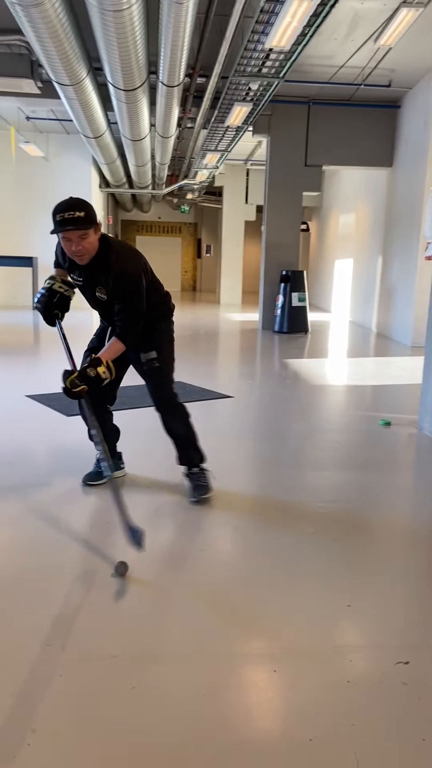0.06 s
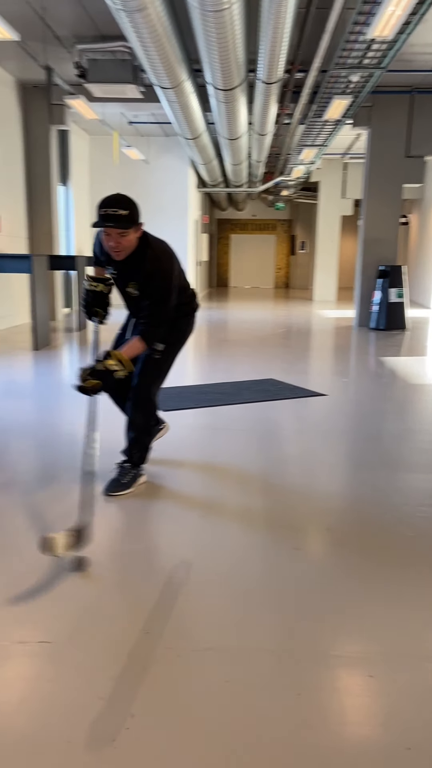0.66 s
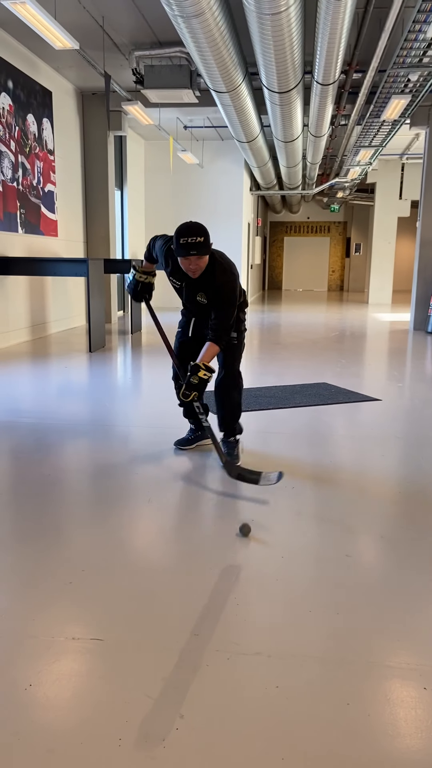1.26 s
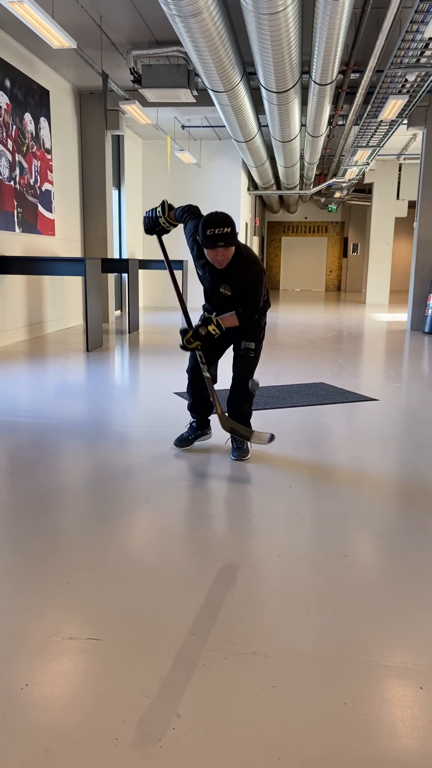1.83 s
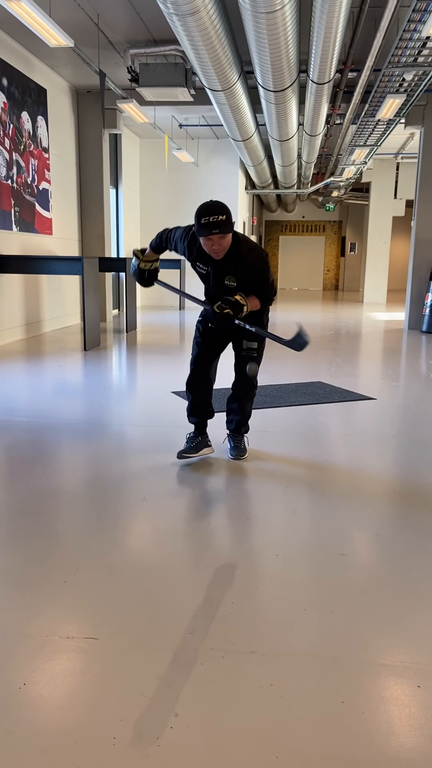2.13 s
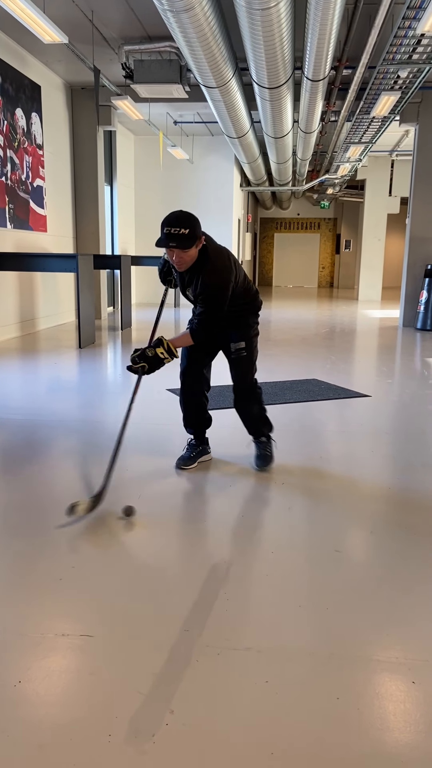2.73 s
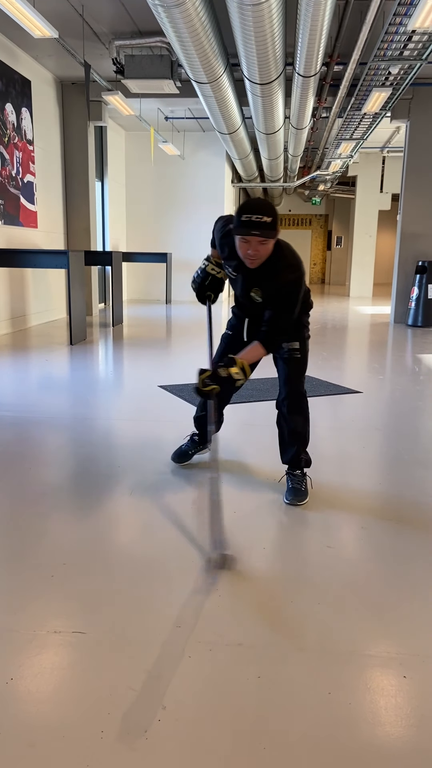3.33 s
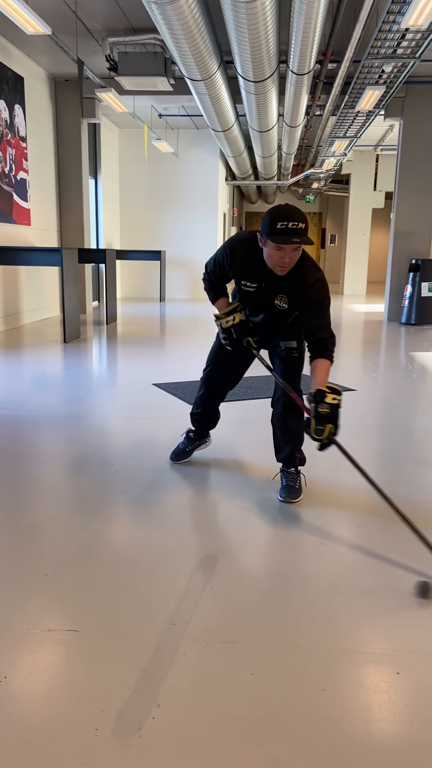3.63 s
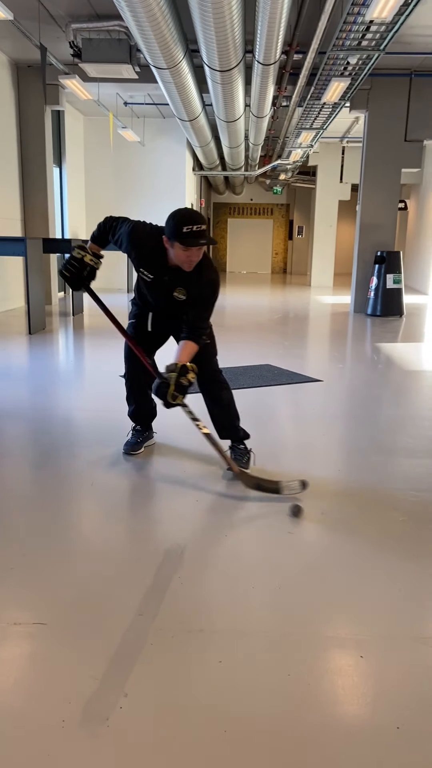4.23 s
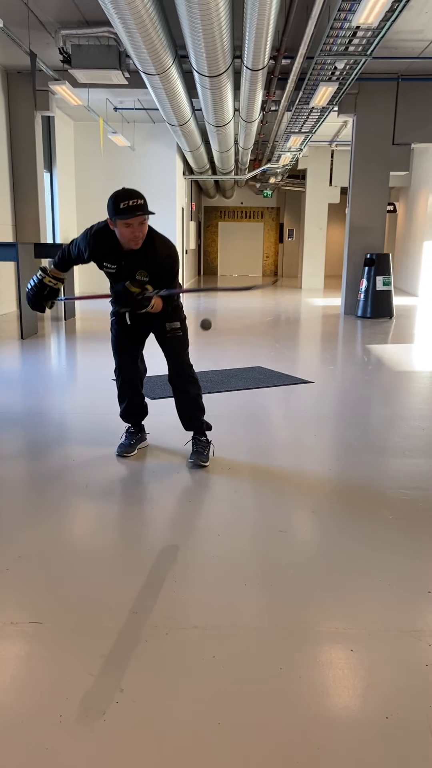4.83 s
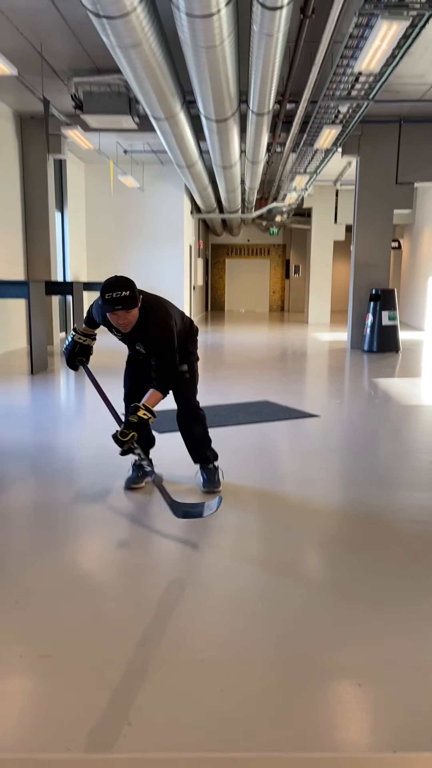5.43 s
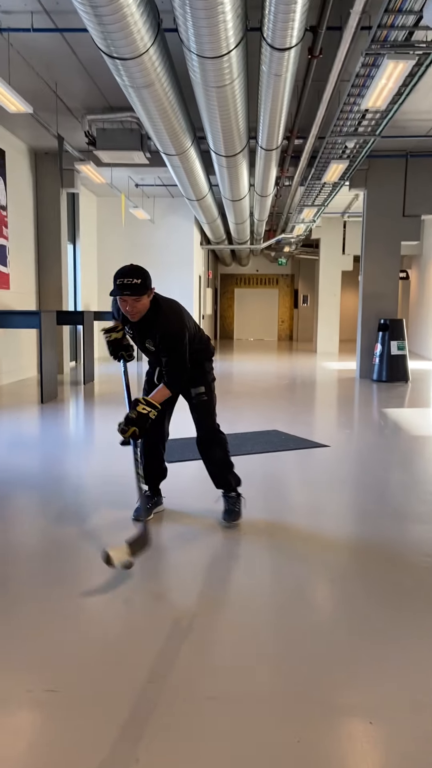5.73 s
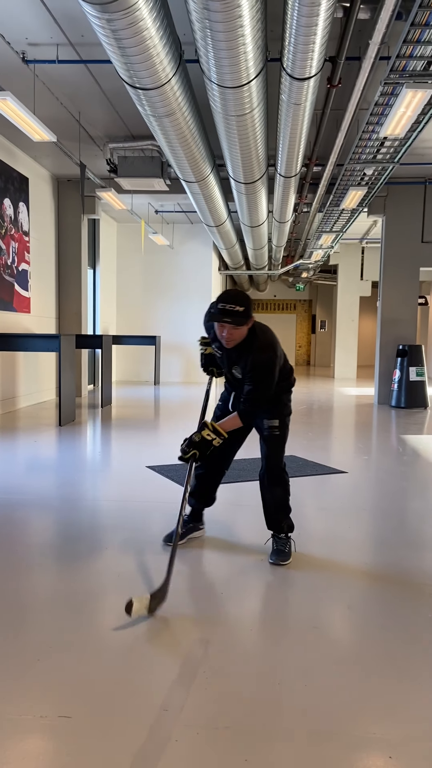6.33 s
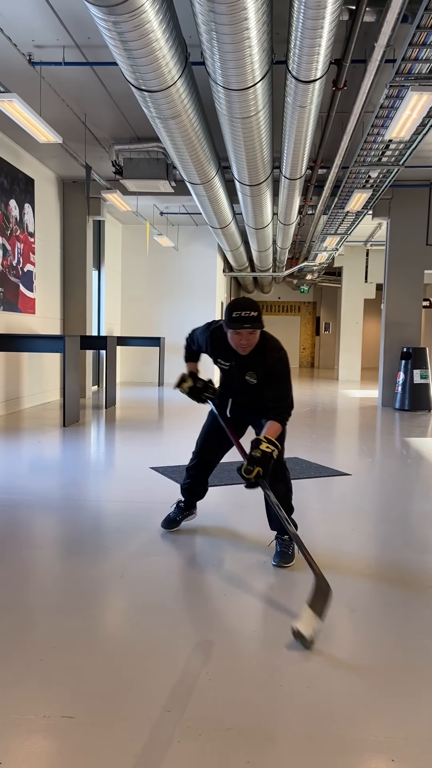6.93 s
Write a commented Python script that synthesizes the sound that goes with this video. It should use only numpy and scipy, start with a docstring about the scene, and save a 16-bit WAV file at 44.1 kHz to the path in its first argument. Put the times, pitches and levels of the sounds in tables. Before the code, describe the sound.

A hockey stick slaps and taps a hard floor and knocks a ball about, echoing through a large hall.

```python
"""A hockey stick slaps and taps the bare floor of a long concrete hall and knocks a hard ball about.
Each blow makes the floor, blade, ball and shaft ring briefly, and the ball gives a hollow pop.
The sound echoes off the ceiling and a pillar, then fills the hall and dies away.
Shoes thump and scuff softly, and the ventilation hums behind it all."""
import sys
import numpy as np
from scipy import signal
from scipy.fft import rfft, irfft, next_fast_len
from scipy.io import wavfile
from scipy.ndimage import uniform_filter1d

SR = 44100
rng = np.random.default_rng(int(sys.argv[2]) if len(sys.argv) > 2 else 0)


def wav_out(sig):
    """Save sig, one row per channel (or a flat mono array), as 16-bit PCM at SR to the path in sys.argv[1]."""
    wavfile.write(sys.argv[1], SR, np.round(np.clip(np.atleast_2d(sig).T, -1, 1) * 32767).astype(np.int16))


N = 307377

# The blade slaps the floor edge first, then falls flat. Each row: start in seconds, level in dB,
# extra direct sound in dB, grit in dB, delay of the flat landing in seconds, its level against the slap
# in dB, favoured pitch in Hz, its boost in dB, hardness in dB, extra crack and tick in dB,
# damping by the grip as a factor (smaller rings longer).
BLADE_SLAPS = [(-.076, -9.5, 3, -8, .013, -4.5, 766, 2, -1, .5, 0.89),
               (.187, -14.5, 0.5, 1, 0.0094, -18, 1150, 8, 6, 2.5, .8),
               (0.216, -12.5, 4, 7, 0.012, 0.5, 1740, 14, 2.5, -3, 0.6),
               (0.5084, -11.5, 0.5, -5.5, 0.012, -5.5, 1340, 3, -5, .5, 1),
               (2.3997, -8.5, 1.5, 3, 0.014, -12, 1860, 12.5, 3.5, 1, 0.46),
               (2.8338, -8.5, 1, 3, .0215, -10, 945, 3, -1, 2.5, 0.63),
               (3.0757, -14.5, 0.5, -14, 0.013, -5.5, 1060, 6.5, 1, 0, 1),
               (3.2837, -11.5, 0.5, 6, 0.023, -12, 2800, 11, -2, 2.5, 0.69),
               (3.2955, -9, -2.5, 2.5, .015, -10.5, 1380, 5, 3, -2.5, 1),
               (3.5452, -12, -2, 2, 0.015, -13, 2400, 4.5, 5, 4, 0.78),
               (3.7413, -17.5, -1, 6.5, 0.01, -4.5, 1006, 10.5, 4.5, 2.5, 0.65),
               (5.2006, -15.5, -1, -2.5, 0.013, -26, 1210, 8.5, 2, 2.5, 0.67),
               (5.6699, -13.5, 0, -6, .014, -21, 1010, 2, -5, 8, 0.7),
               (5.9969, -5.5, -3, 5, 0.016, -20, 1640, 5, 1.5, 3, 0.69),
               (6.0578, -15.5, 5.5, 1.5, 0.019, 0, 690, 6, -9, 9.5, 1),
               (6.301, -10, -3, -12, .013, -9.5, 1150, 1, 4.5, 1, .9),
               (6.4738, -9.5, -1, -15, 0.024, -4, 1500, 5.5, -.5, 3, 0.65),
               (6.8314, -13.5, -2.5, -9, 0.012, -15.5, 1360, 8, 2.5, -4, 0.93)]
# The blade's toe clicks, then scrapes. Each row: start in seconds, level in dB, extra direct sound in dB,
# delay of the scrape in seconds, its level against the click in dB, then the same last five as a slap.
TOE_CLICKS = [(.176, -16.5, -3, 0.0061, -7, 2560, 7, -0.5, 2, 0.62),
              (0.4232, -17, -2, 0.0092, -9, 1470, 10, 6, 3.5, 0.76),
              (.809, -16.5, -2, .015, -5.5, 2490, 9, 2.5, 3, 0.29),
              (2.3727, -24, -0.5, .008, 8, 2530, 12, 5, -3, 0.99),
              (3.0296, -17, -1, .013, -2.5, 2130, 6, 12, 10, 0.86),
              (4.949, -22, -2.5, 0.0072, -15, 2050, 1, 1.5, 3, 0.58),
              (5.1211, -23, 2, .008, 6, 3300, 8.5, 4, 0, 1),
              (5.6066, -25.5, -1, 0.0077, 5, 3130, 14, 6, -1, 1),
              (6.251, -12, -1.5, 0.014, -10, 3480, 3.5, 6, 13.5, 0.66),
              (6.761, -18, -7, 0.011, -4.5, 2030, 5, 5.5, 2, 0.96)]
# The blade knocks the ball. Each row: start in seconds, level in dB, extra direct sound in dB, pitch of
# the pop in Hz, its filter's width in Hz, rattle against the pop in dB, extra crack and tick in dB.
BALL_KNOCKS = [(.848, -18.5, 1.5, 1440, 1664, -2, 6.5), (2.7553, -13.5, 0, 1716, 1550, -3.5, -3.5),
               (4.279, -16.5, 0.5, 1580, 1100, -6.5, 3), (4.3335, -17.5, 1, 1940, 1400, -2.5, 3.5),
               (5.186, -16.5, 4.5, 1340, 1400, -3.5, -4)]
# The ball lands on its own. The rows read like those of the knocks.
BALL_BOUNCES = [(1.454, -31.5, -0.77, 1500, 2020, -1, 0.0022),
                (1.592, -24.5, -1.7, 1694, 1580, -7.5, 0.0065)]

# The tones (modes) at which each struck part rings. Each row: pitch in Hz, width in Hz, relative level
# in dB. A wider mode dies away sooner.
FLOOR_MODES = [(76, 79, -11.5), (147.4, 55, -1), (214.6, 79, 3), (316, 152, 2.5), (431, 127, -1)]
BLADE_MODES = [(472, 123, -5.5), (673, 87, -2), (820.5, 76, 0.5), (928, 138, 1.5), (1028, 188, 3),
               (1194, 188, -1)]
BALL_MODES = [(1314, 166, 2), (1653, 148, 5.5), (1928, 150, 5.5), (2237, 247, 3.5), (2654, 113, 2.5),
              (2914, 91, -3.5)]
SHAFT_MODES = [(2683, 286, -0.5), (2934, 203, 2), (3300, 480, -2.5), (3646, 100, 4.5), (4066, 215, 0.5),
               (4365, 142, -1), (4614, 153, 2.5), (5100, 370, 0), (5556, 390, 2)]
TICK_MODES = [(5850, 160, 15), (6390, 1000, 9), (6720, 510, 10.5), (8090, 1040, 5), (10500, 5000, 1.5),
              (15900, 1500, -6)]
FOOT_MODES = [(59, 48, -21), (132.6, 23, -1)]
# How each kind of contact shares its energy. Each lists, in relative dB: floor thud, blade clack,
# ball knock, shaft crack, high tick.
SLAP_SHARES = (-19.5, -2, 0, -6.5, -13)
FLAT_SHARES = (-17.5, -1.5, -9.5, -7.5, -19.5)
TOE_SHARES = (-14, -1, -1.5, -4, -17)
SCRAPE_SHARES = (-17.5, -16, -7.5, -1, -43)
KNOCK_SHARES = (-14.5, -9, -2, -5, -6.5)
BOUNCE_SHARES = (-6.5, 0.5, -6.5, -25.5, -45)
# A harder contact is brighter: the dB added to those five parts for each dB of hardness.
HARDNESS_TILT = (-1, -0.66, 0.43, 0.68, 0.29)

# How long the hall rings. Each row: pitch in Hz, seconds to fade by 60 dB.
HALL_FADE_TIMES = [(100, 1.4), (250, 2.43), (600, 2.1), (1500, 1.384), (2200, 1.47), (4000, 1.113),
                   (6500, 0.7), (10000, 0.51), (16000, 0.27)]
# Heavy steps. Each row: start in seconds, level in dB.
FOOTFALLS = [(2.38, -35.5), (4.28, -50), (5.12, -30), (5.6, -35)]
# Shoes and blade rub the floor. Each row: middle in seconds, length in seconds, level in dB, pitch in Hz.
FLOOR_SCUFFS = [(1.36, 0.029, -62, 3300), (2.198, 0.17, -80.5, 5640), (4.17, 0.2, -65, 12100),
                (4.912, 0.13, -70.5, 4450)]
# The tone of the air in the ducts. Each row: pitch in Hz, relative level in dB.
VENT_SPECTRUM = [(25, -20), (40, -10), (55, 0), (90, -4), (135, 1), (230, -13.5), (600, -19.5),
                 (1700, -12.5), (3400, -31), (5300, -33), (8000, -39.5), (15000, -53.5)]
# How alike the hall sounds on the left and right. Each row: pitch in Hz, likeness (1 is identical).
STEREO_LIKENESS = [(150, .997), (260, .985), (360, .92), (460, .75), (600, .45), (850, .38), (1300, .58),
                   (2000, .4), (3000, .15), (5000, .52), (7000, .98), (7700, .98), (10000, .78),
                   (13500, .97)]
# How far the left channel runs ahead of the right. Each row: pitch in Hz, phase in radians.
LEFT_PHASE_LEAD = [(100, 0), (1800, -.05), (3000, .9), (4200, .9), (5100, .3), (6300, 1.5), (7350, 3.14),
                   (8500, 4.5), (10400, 6.28), (12000, 7.9), (13550, 9.42), (16300, 12.3)]

BLOW_SIZE, LEAD = 4096, 8820  # in samples: one blow, and a run-up so that the hall starts out ringing


def stickwork(direct_boost_db=22, ceiling_s=0.0124, ceiling_db=-7.5, pillar_s=0.0215, pillar_db=-17.5):
    """Each blow arrives directly, off the ceiling and off a pillar; blows and steps make the hall ring."""
    near = np.zeros((2, N + LEAD))
    spots = np.zeros((5, N + LEAD))  # sounds take turns among five spots, each with its own hall ring
    for k, (start, db, sound, direct) in enumerate([*slaps(), *toe_taps(), *ball_pops()]):
        direct = undb(db + direct_boost_db) * direct
        pillar_delay = pillar_s * rng.uniform(0.95, 1.05)
        for side in near:  # each microphone gets its own spray of echoes
            add(side, start, direct)
            add(side, start + ceiling_s, echo(direct) * undb(ceiling_db))
            add(side, start + pillar_delay, echo(direct) * undb(pillar_db))
        add(spots[k % len(spots)], start, undb(db) * sound)
    for k, (start, db) in enumerate(FOOTFALLS):
        add(spots[k % len(spots)], start, undb(db) * ring(1, FOOT_MODES))
    reverb = sum(signal.fftconvolve(spot[None], hall(), axes=1)[:, :N + LEAD] for spot in spots)
    return (near + reverb)[:, LEAD:]


def slaps():
    """The blade's edge slaps, then its face clacks. Gives start, dB, sound for the hall, direct sound."""
    for start, db, direct_db, grit_db, flat_s, flat_db, *tone in BLADE_SLAPS:
        slap = blow(SLAP_SHARES, grit_db, *tone)
        yield start, db, slap, undb(direct_db) * head_on(slap)
        flat = blow(FLAT_SHARES, grit_db=-0.5, hz=760, boost_db=11)
        yield start + flat_s, db + flat_db, flat, undb(2.5) * flat


def toe_taps():
    """The toe clicks, then a gritty scrape rings the shaft. Gives the same four things as slaps()."""
    for start, db, direct_db, scrape_s, scrape_db, hz, boost_db, hardness, crack_db, damping in TOE_CLICKS:
        tone = dict(hz=hz, boost_db=boost_db, damping=damping)
        click = blow(TOE_SHARES, grit_db=-2.5, hardness=hardness, crack_db=crack_db, **tone)
        yield start, db, click, undb(direct_db) * head_on(click)
        scrape = dull(blow(SCRAPE_SHARES, grit_db=7.5, grit_s=0.0088, **tone), top_hz=5000)
        yield start + scrape_s, db + scrape_db, scrape, undb(-0.5) * scrape


def ball_pops():
    """The ball pops while blade or floor rattle under it. Gives the same four things as slaps()."""
    for rows, shares, grit_db in ((BALL_KNOCKS, KNOCK_SHARES, 4), (BALL_BOUNCES, BOUNCE_SHARES, -6.5)):
        for start, db, direct_db, hz, width, rattle_db, crack_db in rows:
            # a soft contact: filtering three times makes the pop swell over a cycle or two
            pop = unit(irfft(resonance(bins(BLOW_SIZE), hz, width) ** 3))
            rattle = dull(blow(shares, grit_db, crack_db=crack_db, damping=1.63), top_hz=5630)
            knock = unit(pop + undb(rattle_db) * rattle)
            yield start, db, knock, undb(direct_db) * knock


def blow(shares_db, grit_db, hz=1000, boost_db=0, hardness=0, crack_db=0, damping=1, grit_s=0.0035):
    """One contact rings every part; where it lands favours one pitch, and hardness shifts the balance."""
    emphasis = 1 + (undb(boost_db) - 1) * resonance(bins(BLOW_SIZE), hz, width=480)
    push = contact(grit_db, grit_s) * emphasis
    tilt_db = hardness * np.array(HARDNESS_TILT) + crack_db * np.array([0, 0, 0, 1, 1])
    shares = unit(undb(np.array(shares_db) + tilt_db))
    parts = (FLOOR_MODES, BLADE_MODES, BALL_MODES, SHAFT_MODES, TICK_MODES)
    return sum(share * ring(push, modes, damping) for share, modes in zip(shares, parts))


def contact(grit_db, grit_s, snap_s=0.00044, grit_top_hz=7000):
    """The spectrum of a push: a hard snap, then gritty chatter, with all pitches about equally strong."""
    t = np.arange(BLOW_SIZE) / SR
    burst = rfft(rng.standard_normal(BLOW_SIZE) * np.exp(-t / snap_s))
    snap = irfft(burst / np.abs(burst)) * np.exp(-t / (10 * snap_s))
    grit = rng.standard_normal(BLOW_SIZE) * rng.exponential(size=BLOW_SIZE) * np.exp(-t / grit_s)
    soft_grit = rfft(unit(grit)) / (1 + 1j * bins(BLOW_SIZE) / grit_top_hz)
    push = rfft(unit(snap)) + undb(grit_db) * soft_grit
    evened = irfft(push / np.sqrt(uniform_filter1d(np.abs(push) ** 2, size=21)))
    fade = np.cos(np.pi / 2 * t / t[-1]) ** 2
    return rfft(evened * fade)


def ring(push, modes, damping=1, scatter=0.017):
    """A pushed part rings at its own pitches, which shift a little with grip and contact point."""
    f = bins(BLOW_SIZE)
    shift = 1 + scatter * rng.standard_normal(len(modes))
    # neighbouring modes bend the struck point in opposite directions
    body = sum((-1) ** k * undb(db) * resonance(f, hz * shift[k], width * damping)
               for k, (hz, width, db) in enumerate(modes))
    edges_hz = [modes[0][0] * 0.55, min(modes[-1][0] * 0.89, SR / 2 - 1000)]
    band = signal.butter(N=2, Wn=edges_hz, btype="band", fs=SR, output="sos")
    return unit(signal.sosfilt(band, irfft(push * body)))


def head_on(sound, beam_hz=6000, beam_db=2, rattle_s=0.001412, rattle_db=2):
    """A blow heard directly: a crack, its treble beamed forward by the blade, then the parts rattling."""
    first = crack(sound)
    beam = signal.lfilter(*signal.butter(N=1, Wn=beam_hz, btype="high", fs=SR), first)
    rattle = np.pad(sound, (int(rattle_s * SR), 0))[:BLOW_SIZE]
    return unit(first + undb(beam_db) * beam + undb(rattle_db) * rattle)


def crack(sound, delay_at_1khz_s=0.001185):
    """The sharp front of a blow; bending waves carry the treble out first."""
    colour = np.sqrt(np.abs(uniform_filter1d(np.abs(rfft(sound)) ** 2, size=25)))
    # keep the tone colour but pack the energy at the very start (minimum phase)
    cepstrum = irfft(np.log(colour + colour.max() / 1000))
    fold = 1 + np.sign(BLOW_SIZE // 2 - np.arange(BLOW_SIZE))
    fold[0] = 1
    bass_lag = 4 * np.pi * delay_at_1khz_s * np.sqrt(1000 * bins(BLOW_SIZE))
    return unit(irfft(np.exp(rfft(cepstrum * fold) - 1j * bass_lag)))


def dull(sound, top_hz):
    """A soft contact leaves out the treble."""
    return unit(signal.sosfilt(signal.butter(N=2, Wn=top_hz, fs=SR, output="sos"), sound))


def echo(sound, spray_s=0.0057, spray_db=-5):
    """A surface throws a blow back as one clear copy and a short spray of later ones."""
    t = np.arange(BLOW_SIZE // 8) / SR
    spray = undb(spray_db) * unit(rng.standard_normal(len(t)) * np.exp(-t / spray_s))
    return signal.fftconvolve(sound, unit((t == 0) + spray))


def hall(early_db=-7, early_s=0.04, late_db=-11.5, build_s=0.0053):
    """The hall's answer to a click: dense early echoes, then a long tail that loses its treble first."""
    size = 2 * SR
    t, f = np.arange(size) / SR, bins(size)
    noise = stereo_noise(size) / np.sqrt(2)
    early = undb(early_db) * np.exp(-t / early_s)
    pitches, fade_times = np.transpose(HALL_FADE_TIMES)
    response = 0
    for one_band, fade_s in zip(np.eye(len(pitches)), fade_times):
        band = along(np.c_[pitches, one_band], f)
        late = undb(late_db) * np.exp(-np.log(1000) * t / fade_s)
        response = response + irfft(noise * band) * np.hypot(early, late)
    return response * (1 - np.exp(-(t / build_s) ** 2))


def scuffs():
    """Shoes and blade rub the floor in short, soft swells of noise."""
    t, noise, track = np.arange(N) / SR, rng.standard_normal(N), 0
    for middle, length, db, hz in FLOOR_SCUFFS:
        rub = signal.lfilter(*signal.iirpeak(hz, Q=1, fs=SR), noise)
        swell = np.exp(-(2 * (t - middle) / length) ** 2)
        track = track + undb(db) * rub / rub.std() * swell
    return track


def ventilation(level_db=-58):
    """Air rushes steadily through the ducts, strongest in the bass."""
    size = 2 * next_fast_len(N // 2 + 1)
    air = irfft(stereo_noise(size) * undb(along(VENT_SPECTRUM, bins(size))))[:, :N]
    return undb(level_db) * air / air.std()


def stereo_noise(size):
    """Left and right spectra of noise that is more alike at some pitches than at others."""
    shared, apart = rfft(rng.standard_normal((2, size)))
    alike = np.clip(along(STEREO_LIKENESS, bins(size)), 0, 1)
    return shared * np.sqrt(1 + alike) + np.array([[1], [-1]]) * apart * np.sqrt(1 - alike)


def resonance(f, hz, width):
    """How one mode answers each frequency in f: 1 at its own pitch, less further away."""
    return 1j * f * width / (hz ** 2 - f ** 2 + 1j * f * width)


def add(track, start_s, sound):
    """Lay a sound into a track that begins LEAD samples early."""
    start = max(int(start_s * SR) + LEAD, 0)
    track[start:start + len(sound)] += sound[:len(track) - start]


def along(points, hz):
    """Read between (Hz, value) points, with every octave equally wide."""
    f, value = np.transpose(points)
    return np.interp(np.log(np.maximum(hz, 1)), np.log(f), value)


def bins(size):
    """The frequencies in Hz that make up a spectrum."""
    return np.arange(size // 2 + 1) * SR / size


def undb(db):
    """Turn decibels into a gain."""
    return 10 ** (np.asarray(db) / 20)


def unit(x):
    """Scale to an energy of 1."""
    return x / np.sqrt(np.sum(x ** 2))


def scene():
    """Stick, ball and steps in the hall, over scuffs and moving air."""
    return stickwork() + scuffs() + ventilation()


def record(dry, top_hz=16600):
    """Left and right drift out of step in the treble; peaks are rounded and the very top is cut."""
    size = 2 * next_fast_len(N // 2 + LEAD)
    phase = np.interp(bins(size), *np.transpose(LEFT_PHASE_LEAD))
    turn = np.exp(1j * np.array([[0.5], [-0.5]]) * phase)
    channels = irfft(rfft(dry, size) * turn)[:, :N]
    rounded = 1.5 * np.tanh(channels / 1.5)
    return signal.sosfilt(signal.ellip(8, 0.2, 80, top_hz, fs=SR, output="sos"), rounded)


dry = scene()
out = record(dry)
wav_out(out)
```